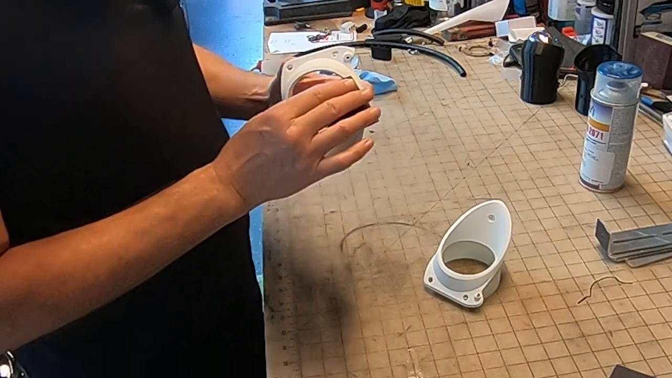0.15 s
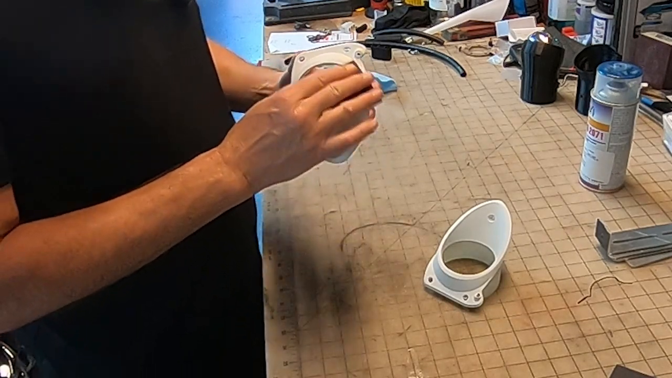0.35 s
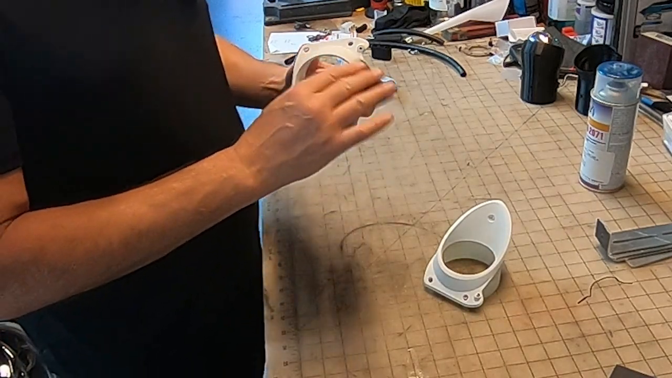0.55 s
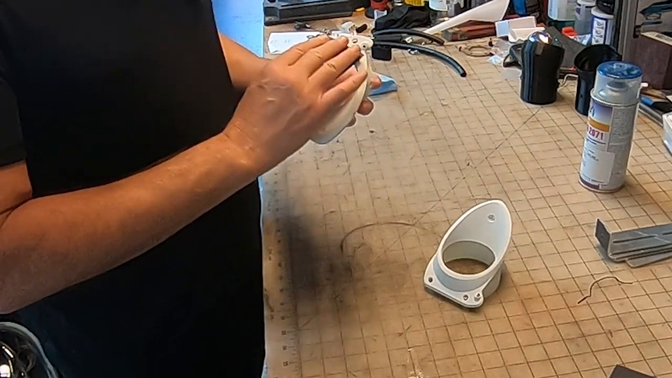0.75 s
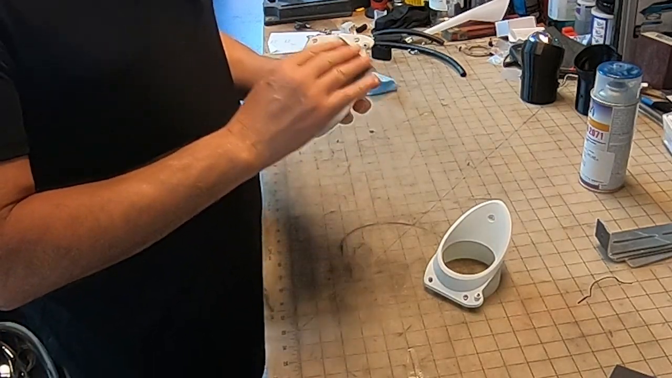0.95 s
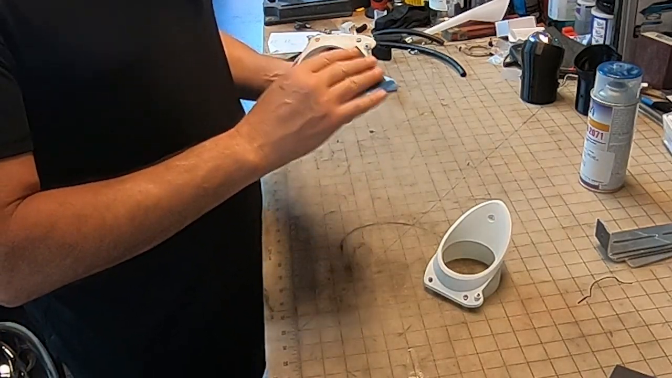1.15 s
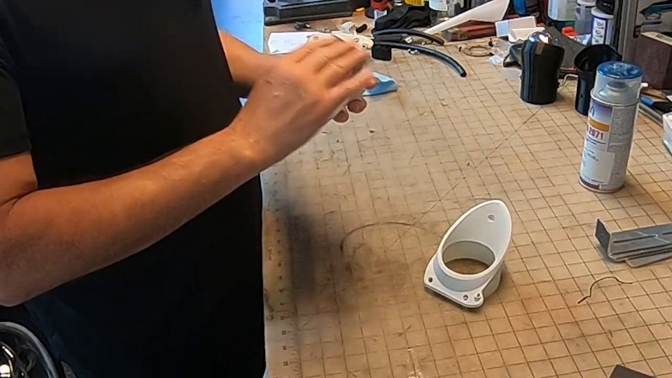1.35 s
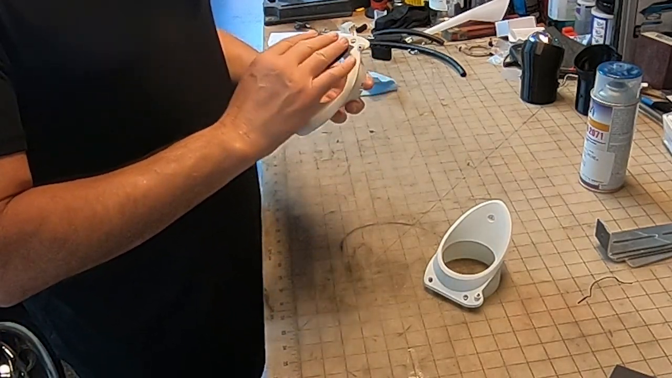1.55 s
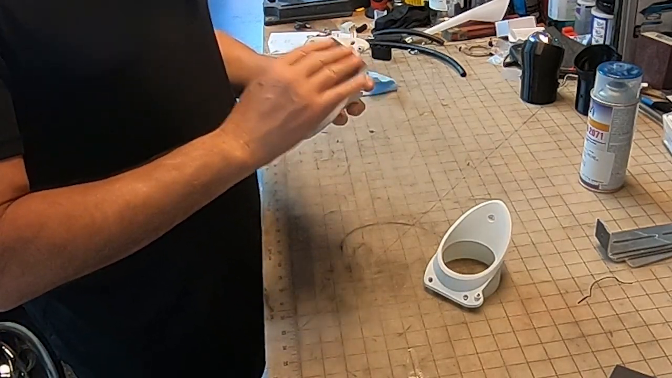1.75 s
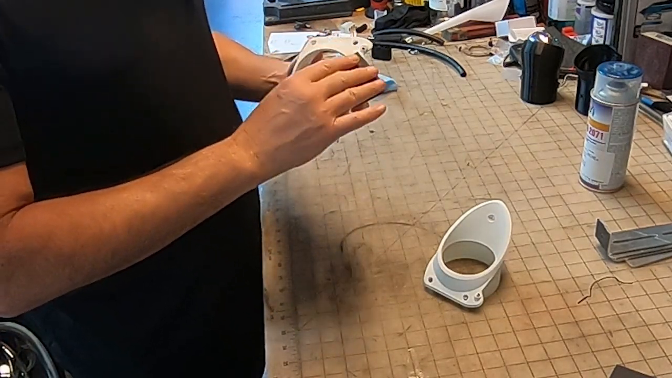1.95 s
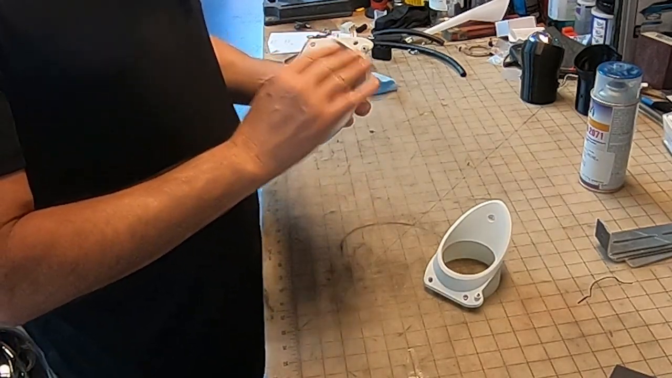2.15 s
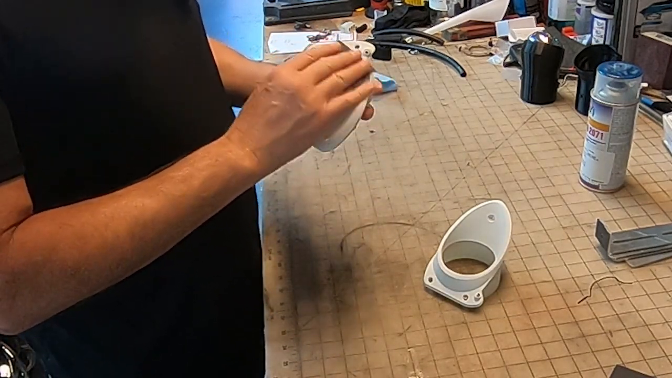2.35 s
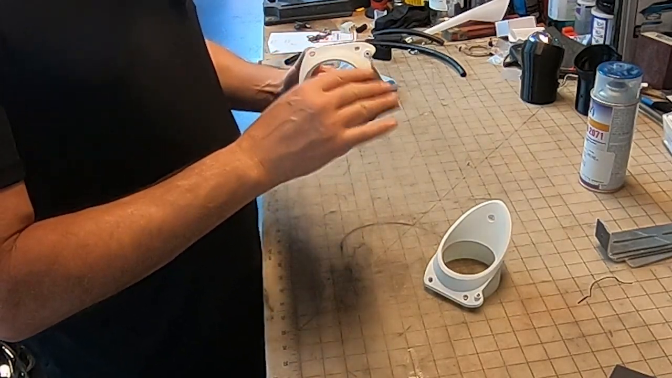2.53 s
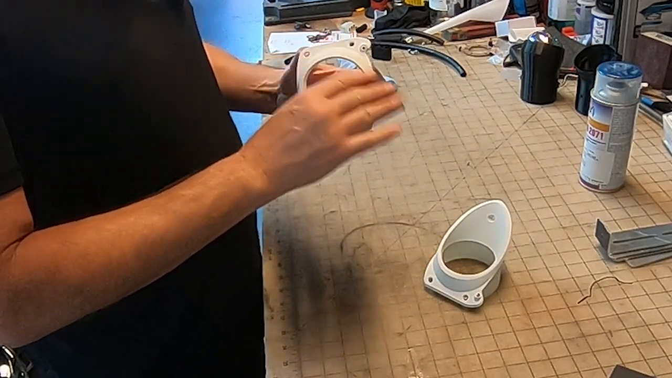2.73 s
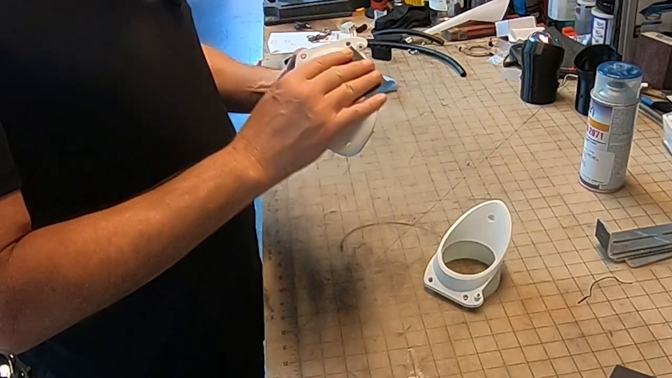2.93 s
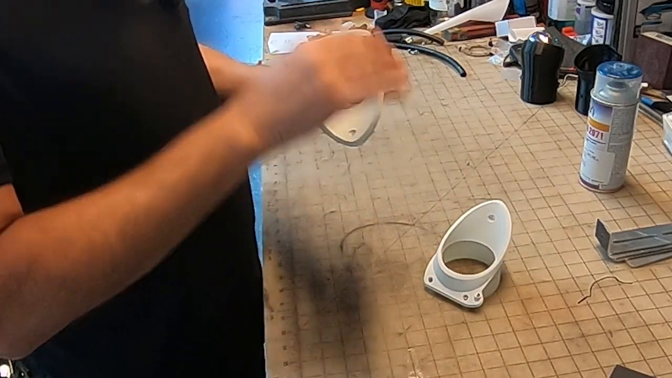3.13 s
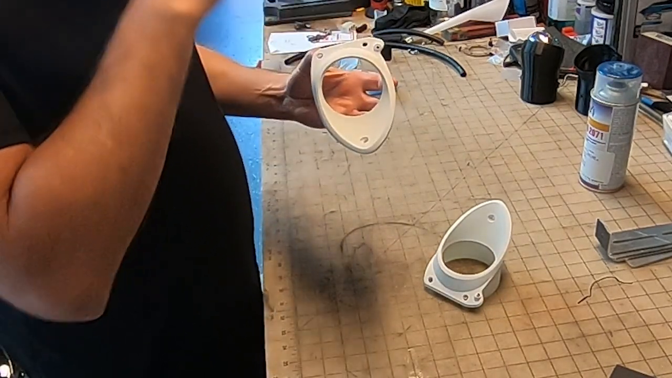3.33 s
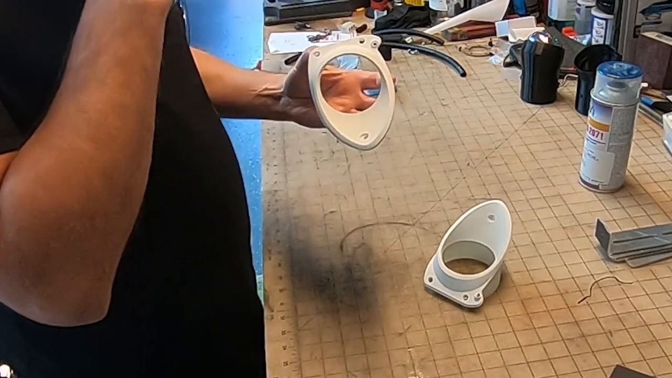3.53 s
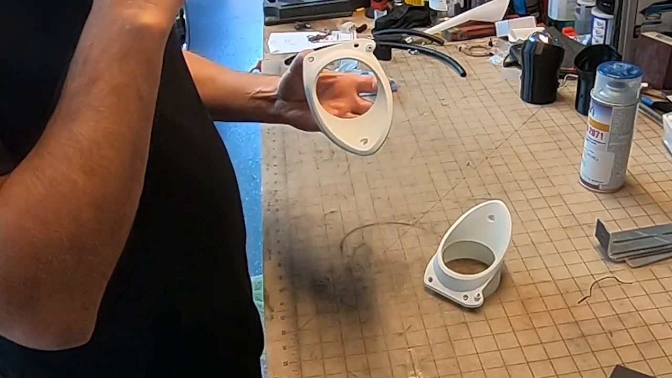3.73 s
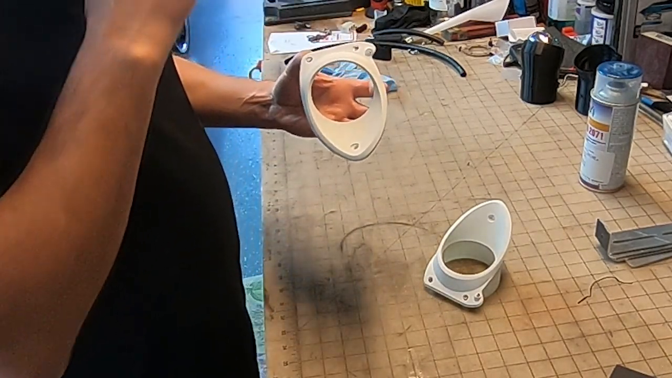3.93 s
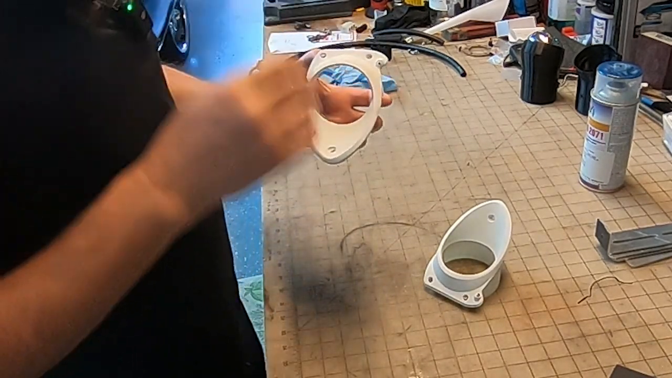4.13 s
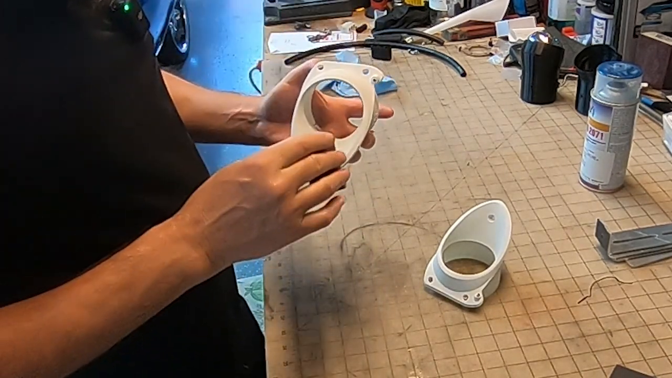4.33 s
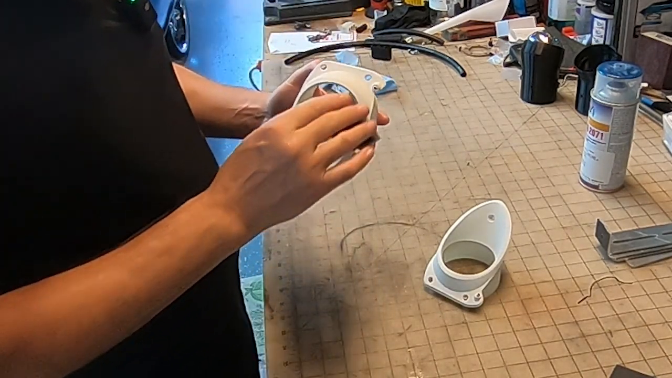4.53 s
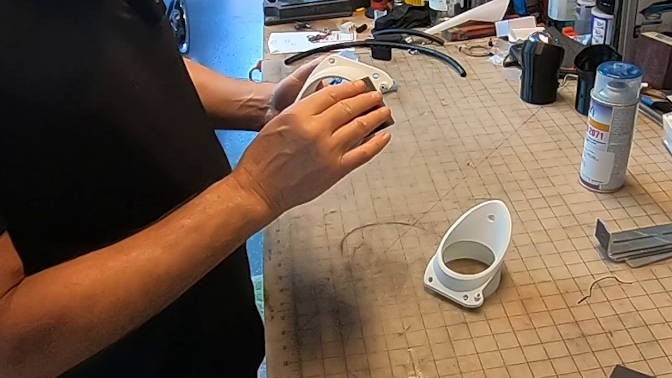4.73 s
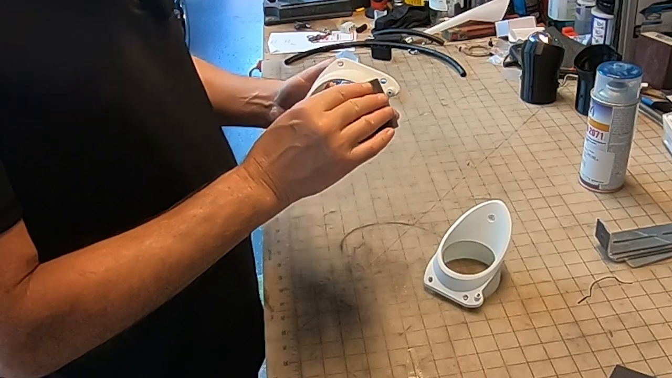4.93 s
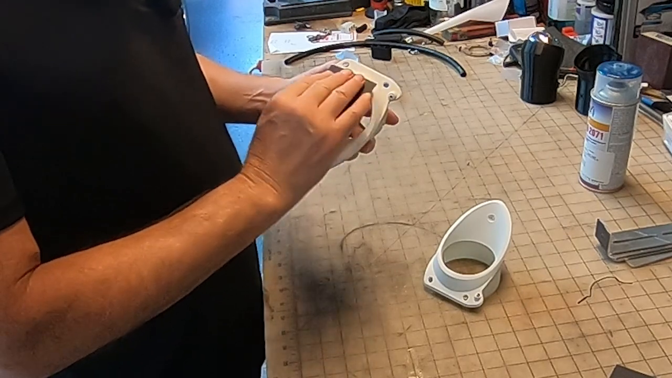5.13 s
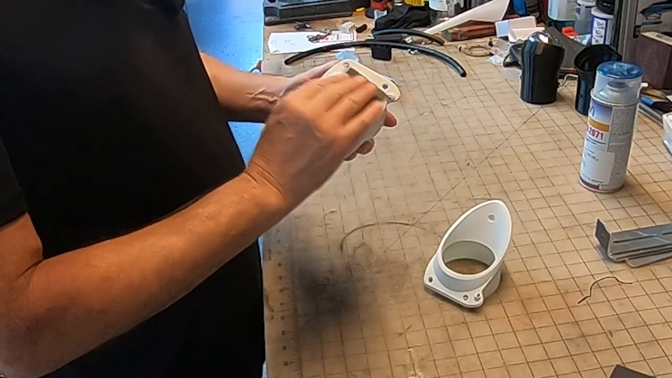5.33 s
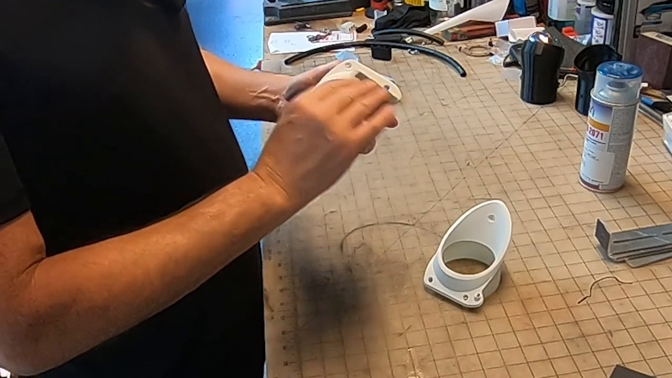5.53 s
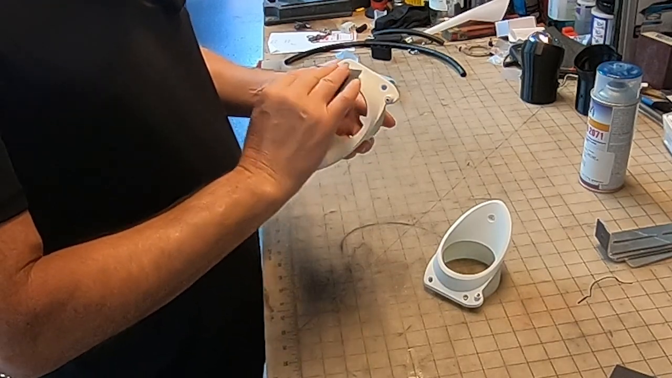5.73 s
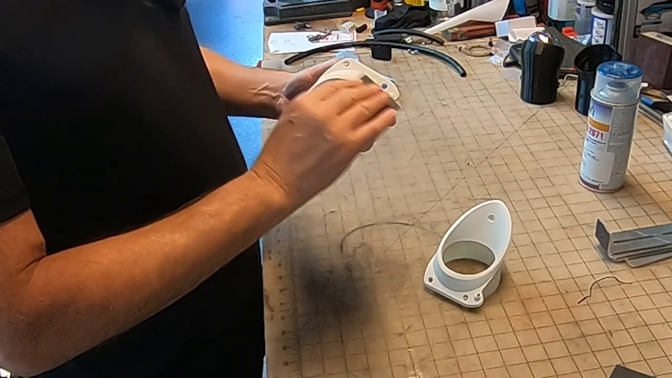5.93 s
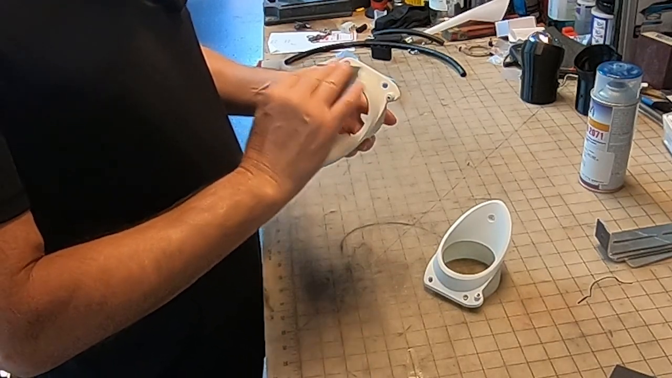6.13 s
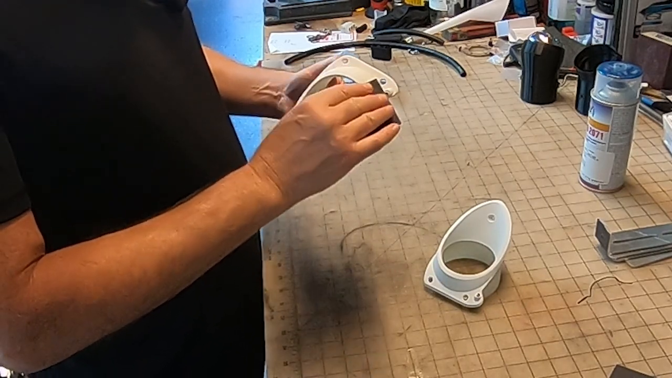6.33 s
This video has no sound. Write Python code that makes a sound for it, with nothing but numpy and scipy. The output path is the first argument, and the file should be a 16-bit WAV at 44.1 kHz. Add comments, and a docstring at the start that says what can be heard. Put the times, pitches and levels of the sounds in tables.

```python
"""Sanding a small plastic ring by hand

Two bouts of quick back-and-forth strokes: random grains of grit make the paper hiss and the plastic ring.
Now and then the paper bites on an edge, in bursts of denser grit with a rasp. Bursts of noise make knocks
and snaps. Around the pause the arm lifts, cloth rustles (shaped noise) and fingers rub (sparse grains).
A quiet workshop hums behind, made of sine tones and steady noise. Both channels are the same."""
import sys
import numpy as np
from scipy import signal
from scipy.fft import rfft, irfft, next_fast_len
from scipy.io import wavfile

SR = 44100
rng = np.random.default_rng(int(sys.argv[2]) if len(sys.argv) > 2 else 0)


def transcribe(u):
    """Save the signal u as a 16-bit wav file named by the first command-line argument.

    u: samples, shape (n,) or (channels, n), limited to [-1, 1]; the rate is SR.
    q: integer samples, one column per channel.
    """
    v = np.clip(np.atleast_2d(u).T, -1, 1)
    q = np.round(v * 32767).astype(np.int16)
    wavfile.write(sys.argv[1], SR, q)


N = 285768  # length in samples
TIME = np.arange(N) / SR  # seconds

# Sanding strokes, push and pull in turn.
# Each row: start in seconds, middle level in dB, rise of pressure over the stroke in dB.
STROKES = [(0.234, -46.5, 11.5), (0.49, -49, -4), (0.608, -43.5, -9), (0.778, -45, -13),
           (0.891, -46.5, -5.5), (1.055, -47, -10.5), (1.164, -45, -8), (1.32, -46.5, -5),
           (1.44, -47.5, -9), (1.587, -48, 2), (1.712, -47.5, -15.5), (1.858, -48, -6.5),
           (1.982, -47.5, -14), (2.13, -49, -1), (2.268, -47, -12.5), (2.413, -49.5, 4.5),
           (2.551, -48, -8.5), (2.688, -47.5, 14), (2.821, -48.5, -7.5), (2.96, -57, -21),
           (4.939, -48, 11.5), (5.15, -49.5, -8), (5.294, -48, -4), (5.455, -47.5, -3), (5.594, -50, -7.5),
           (5.767, -49, -2.5), (5.918, -49.5, -7.5), (6.105, -51, -4.5), (6.327, -51.5, -11)]
# Tone of dry rubbing, also used for the snaps. Each row: frequency in Hz, level in dB.
RUB_COLOUR = [(600, -37), (1200, -8), (1800, -5), (2600, -5.5), (4000, -6.5), (5200, -8.5), (8500, -4),
              (11500, -4.5), (14500, -1), (15700, -4)]


def undb(db):
    """Turn decibels into a gain."""
    return 10 ** (np.asarray(db) / 20)


def unit(x):
    """Scale a sound to an average (rms) level of 1."""
    return x / np.sqrt(np.mean(x ** 2) + 1e-30)


def add(track, start, x):
    """Mix a sound into a track at a time in seconds."""
    i = max(int(start * SR), 0)
    track[i:i + len(x)] += x[:max(N - i, 0)]


def colour(x, points):
    """Shape the tone of a sound through (Hz, dB) points, then scale it to rms 1."""
    hz, db = np.transpose(points)
    size = next_fast_len(len(x))
    f = np.maximum(np.fft.rfftfreq(size, 1 / SR), 1)
    gain = undb(np.interp(np.log(f), np.log(hz), db))
    return unit(irfft(rfft(x, size) * gain, size)[:len(x)])


def resonate(x, modes):
    """Let a sound ring (Hz, width Hz, dB) modes, with alternating sign; rms 1."""
    total = 0
    for k, (hz, width, db) in enumerate(modes):
        ringing = signal.lfilter(*signal.iirpeak(hz, hz / width, SR), x)
        total = total + (-1) ** k * undb(db) * ringing
    return unit(total)


def detune(modes, spread, spread_db):
    """The fingers press a little differently each time, which shifts each mode in pitch and level."""
    chances = rng.standard_normal((len(modes), 2))
    return [(hz * (1 + spread * a), width, db + spread_db * b)
            for (hz, width, db), (a, b) in zip(modes, chances)]


def walk(size, rate):
    """Random wandering with a spread near 1, which takes a new direction rate times a second."""
    points = rng.standard_normal(size)
    return 1.2 * np.interp(np.arange(size) * rate / SR, np.arange(size), points)


def grit(size, rate, spread_db):
    """Scratches of single grains, about rate a second, some larger than the rest; rms 1."""
    hit = rng.random(size) < rate / SR
    strength = rng.uniform(-1, 1, size)
    extra_db = spread_db * np.minimum(rng.exponential(size=size), 3.5)
    return unit(hit * strength * undb(extra_db))


def burst(t60):
    """Noise that starts at once and dies away by 60 dB in t60 seconds."""
    t = np.arange(SR // 8) / SR
    return rng.standard_normal(len(t)) * np.exp(-np.log(1000) * t / t60)


def sweep(start, end, skew, grip, sticking=2.04):
    """Progress (-.5 to .5) and rubbing strength of one stroke: the hand is at rest at both ends."""
    u = np.linspace(0, 1, int((end - start) * SR))
    return u - .5, np.tanh(grip * np.abs(np.sin(np.pi * u ** skew)) ** sticking)


def stroke_spans():
    """Start and end of each stroke: it runs until the hand turns, stops or reaches its limit."""
    # When the hand stops at the end of each bout, in seconds.
    bout_ends_s = [3.134, 6.57]
    longest_s = .24  # the full reach of the wrist, without the overlap
    overlap_s = 0.0048  # the paper still slides as the hand turns
    starts = [row[0] for row in STROKES]
    spans = []
    for start in starts:
        limits = starts + bout_ends_s + [start + longest_s]
        spans.append((start, min(end for end in limits if end > start) + overlap_s))
    return spans


def workshop():
    """Steady air noise and the slightly wavering hum of a fan motor, one sine for each tone."""
    # Motor hum. Each row: frequency in Hz, middle level in dB rms.
    hum_tones = [(43, -86.5), (75, -93), (113, -84), (225, -86), (240, -84.5), (360, -90.5), (600, -88),
                 (721, -100)]
    # Tone of the air noise. Each row: frequency in Hz, level per Hz in dB.
    air_colour = [(15, -30), (25, 0.5), (42, 2), (156, -5), (234, -2.5), (307, -9), (485, -5), (540, -13.5),
                  (602, -5.5), (652, -11.5), (727, -5), (1000, -10), (2080, -13.5), (15700, -26)]
    air_db = -73.5
    hum = 0
    for hz, db in hum_tones:
        loudness = undb(db + 2.0 * walk(N, rate=4))
        phase_drift = .5 * walk(N, rate=5)  # radians
        hum = hum + loudness * np.sin(2 * np.pi * hz * TIME + phase_drift)
    air = undb(air_db) * colour(rng.standard_normal(N), air_colour)
    return np.sqrt(2) * hum + air  # the root of 2 turns sine peaks into rms levels


def room(x, t60=0.3, tail_db=-11.5, bench_s=.0021, bench_db=-13):
    """The bench top reflects almost at once; the cluttered room adds a short tail of fading noise."""
    t = np.arange(SR // 2) / SR
    tail = rng.standard_normal(len(t)) * np.exp(-np.log(1000) * t / t60) * (t > .004)
    tail = colour(tail, [(200, 4.0), (2000, -1.0), (6000, 1), (15000, 0.5)])
    response = undb(tail_db) * tail / np.sqrt(len(t))
    response[0] += 1  # the direct sound
    response[int(bench_s * SR)] += undb(bench_db)
    return signal.fftconvolve(x, response)[:N]


def flutter(pitch):
    """Low flapping of loose cloth, as shaped noise; larger folds sound lower."""
    # Tone of the flapping at pitch 1. Each row: frequency in Hz, level in dB.
    flap_colour = [(70, -31), (130, -5), (190, 3.5), (260, 0), (340, -11), (700, -27)]
    return colour(rng.standard_normal(N), [(hz * pitch, db) for hz, db in flap_colour])


def cloth(flutter_db=-1, swish_db=-2, folds_db=2.0):
    """The shirt flutters and swishes softly during the strokes, and swells with each larger arm move."""
    # Arm moves that stir the shirt. Each row: peak time in seconds, rise in seconds, fall in seconds,
    # flutter in dB, flutter pitch as a ratio, swish in dB (both before the overall gains flutter_db, swish_db).
    arm_moves = [(0.05, .2, 0.4, -74, 1.08, -73), (2.6, .25, 0.27, -70.5, 1.06, -81),
                 (3.1, 0.13, .1, -60.5, 1.01, -79), (3.4, 0.091, 0.044, -72, 0.93, -75.5),
                 (4.32, 0.27, .05, -70.5, 0.75, -78), (4.75, .12, 0.2, -71.5, 1.43, -70),
                 (6.32, 0.03, 0.038, -89, 1, -67)]
    # Tone of brushing cloth. Each row: frequency in Hz, level in dB.
    swish_colour = [(200, -15), (350, -1), (650, -0.5), (1100, -6.5), (2500, -17.5), (8000, -39)]
    working = sum((TIME >= start) & (TIME < end) for start, end in stroke_spans()) > 0
    # soft cloth sound while the arm works, also before the overall gains
    low = working * undb(-84) * flutter(0.93)
    brushing = working * undb(-78)
    for s, rise_s, fall_s, low_db, pitch, mid_db in arm_moves:
        distance = np.maximum((s - TIME) / rise_s, (TIME - s) / fall_s)
        speed = 1 / np.cosh(np.minimum(distance, 20))
        low = low + undb(low_db) * speed * flutter(pitch)
        brushing = np.hypot(brushing, undb(mid_db) * speed)
    swish = brushing * colour(grit(N, rate=4000, spread_db=1.5), swish_colour)
    folds = undb(folds_db * walk(N, rate=70))
    return (undb(flutter_db) * low + undb(swish_db) * swish) * folds


def light_touch(size, spectrum, hollow_db):
    """Sparse grains with the hollow note of the folded sheet."""
    grains = colour(grit(size, rate=7000, spread_db=2.0), spectrum)
    hollow = resonate(rng.standard_normal(size), [(1714, 120, 0)])
    return unit(grains + undb(hollow_db) * hollow)


def handling():
    """The paper settles on the part, and the fingers rub it: sparse grains that swell and fade."""
    # Paper shifting lightly before each bout. Each row: start in seconds, end in seconds, level in dB.
    settlings = [(0.029, 0.067, -67.5), (4.554, 4.75, -71), (4.68, 4.84, -59.5), (4.799, 4.966, -64.5)]
    # Tone of that shifting. Each row: frequency in Hz, level in dB.
    settling_colour = [(290, -37), (500, -6.5), (890, 0), (1070, -2), (1540, 4.5), (3080, -1.5), (3500, 0),
                       (4350, -6), (5020, -4.5), (5640, -3), (15700, -7)]
    # Light dry finger rubs. Each row: start in seconds, end in seconds, level in dB,
    # hollow note in dB against the grains, change of treble in dB.
    rubs = [(0, 0.237, -73.5, 10, -4), (3.195, 3.213, -65.5, -17, -11), (3.547, 3.686, -66, -5, 8.5),
            (3.706, 3.828, -64, -9.5, 5), (3.851, 3.998, -60.5, -4.5, 4), (4.072, 4.127, -67.5, -19, -5),
            (4.227, 4.277, -70, -12, -14), (6.286, 6.365, -62.5, -5, -7)]
    out = np.zeros(N)
    for start, end, db in settlings:
        along, strength = sweep(start, end, skew=0.67, grip=3.2)
        add(out, start, undb(db) * strength * light_touch(len(along), settling_colour, hollow_db=-20.5))
    for start, end, db, hollow_db, bright_db in rubs:
        along, strength = sweep(start, end, skew=1.05, grip=1.75)
        rub = light_touch(len(along), RUB_COLOUR, hollow_db)
        rub = colour(rub, [(7000, 0), (12000, bright_db)])
        add(out, start, undb(db) * strength * rub)
    return out


def taps():
    """Dull knocks of the hand and bright snaps of the stiff paper, some ringing the part: noise bursts."""
    # Soft knocks. Each row: time in seconds, peak in dB, centre in Hz, 60 dB decay of the burst in seconds.
    knocks = [(3.08, -42.5, 400, 0.022), (3.0875, -51, 600, 0.022), (4.334, -56.5, 171, 0.042),
              (4.4482, -54.5, 620, 0.022)]
    # Paper snaps. Each row: time in seconds, peak in dB, 60 dB decay of the burst in seconds,
    # ringing in dB against the crack.
    snaps = [(0.798, -36.5, 0.035, 12), (2.4286, -43, .04, 12), (3.4675, -46.5, 0.049, 5),
             (3.499, -57, .02, 4), (3.6295, -47, .003, -17), (3.672, -48, 0.0041, -21),
             (3.874, -44, .005, -20), (3.918, -47, .005, -17), (3.959, -50, .003, 0),
             (4.852, -46, 0.016, -22), (6.204, -58, .03, -3), (6.3242, -41.5, 0.022, 0.5)]
    # What a snap rings in the part and the sheet. Each row: centre in Hz, width in Hz, level in dB.
    snap_modes = [(1640, 150, 6), (4080, 230, 1), (8000, 400, -10), (15300, 600, -1.5)]
    out = np.zeros(N)
    soften = signal.butter(2, 1400, fs=SR, output="sos")  # Hz; flesh gives little treble
    for s, db, hz, t60 in knocks:
        knock = resonate(burst(t60), [(hz, 1.3 * hz, 0)])
        knock = resonate(knock, [(hz, 1.6 * hz, 0)])
        knock = signal.sosfilt(soften, knock)
        add(out, s, undb(db) * knock / np.abs(knock).max())
    for s, db, t60, ring_db in snaps:
        crack = burst(t60)
        bright = colour(colour(crack, RUB_COLOUR), [(5000, 0), (12000, 3)])
        snap = bright + undb(ring_db) * resonate(crack, snap_modes)
        add(out, s, undb(db) * snap / np.abs(snap).max())
    return out


def paper(scratches, start, bright_db=0, resonance_db=-8, ripple_db=2.0):
    """Scratches leave the sheet as hiss, coloured anew by each position of the cupped hand."""
    # Hiss in the first and the second grip. Each row: frequency in Hz, level per Hz in dB.
    hiss_first = [(1650, -36), (2800, -38), (2900, -6.5), (3630, -8), (4130, -6), (5130, -1.5),
                  (5720, -2.5), (6280, -1.5), (6950, -4.5), (8940, -0.5), (12300, -3.5), (15000, -1),
                  (15700, -5.5)]
    hiss_second = [(1650, -32), (2750, -5.5), (3150, -4), (3600, -9), (4200, -5.5), (5000, 2.5),
                   (5600, -5.5), (6300, 1.5), (8800, -1.5), (9800, -4.5), (11200, -1.5), (13300, -4),
                   (15100, 3), (15700, -2.5)]
    # Paper resonances under the fingers in each grip. Each row: centre in Hz, width in Hz, level in dB.
    modes_first = [(4994, 230, 1.5), (5280, 210, -3), (6180, 230, -2), (7830, 260, -1), (9100, 150, -16)]
    modes_second = [(3550, 170, -5), (5050, 200, -1), (6200, 300, -1.5), (7770, 220, -2), (8880, 130, 0)]
    regrip_s = 4  # the second grip is used from here on
    hiss, modes = (hiss_first, modes_first) if start < regrip_s else (hiss_second, modes_second)
    coarse = grit(len(scratches), rate=11000, spread_db=0.0)
    ringing = resonate(coarse, detune(modes, spread=0.012, spread_db=2.5))
    sheet = colour(scratches, hiss) + undb(resonance_db) * ringing
    # reflections between palm and part ripple the spectrum
    hz = np.linspace(3000, 16000, 40)
    treble_db = np.interp(hz, (6000, 11000), (0, bright_db))
    ripple = ripple_db * rng.standard_normal(len(hz))
    return colour(sheet, np.transpose([hz, treble_db + ripple]))


def plastic(scratches):
    """Scratches ring the hand-held part, whose modes shift with the squeeze of the fingers."""
    # Modes of the plastic ring, damped by the hand. Each row: middle pitch in Hz, width in Hz, level in dB.
    ring_modes = [(854, 86, -10.5), (1192, 147, -7), (1516, 140, -2.5), (1692, 93, 2.5), (1904, 136, -3),
                  (2088, 160, -1), (2398, 67, -1), (2557, 126, -3.5), (3605, 310, 8)]
    # How well so small a part gives off sound. Each row: frequency in Hz, level in dB.
    radiation = [(100, -12), (400, 0), (800, 0), (1400, -0.5), (2650, 3), (3000, -15), (4000, -12.5),
                 (6000, -19), (12000, -36)]
    return colour(resonate(scratches, detune(ring_modes, spread=0.016, spread_db=1.5)), radiation)


def bites(attack_s=.003, release_s=0.015, ring_db=-16, rasp_db=-8):
    """On an edge the pressure jumps and the sheet rasps in one broad resonance."""
    # Bites of the paper. Each row: start in seconds, end in seconds, level in dB.
    bite_rows = [(0.514, 0.54, -53.5), (0.583, 0.596, -44), (0.867, 0.879, -41), (0.917, 0.961, -43),
                 (1.13, 1.15, -52), (1.678, 1.699, -51), (1.946, 1.968, -41), (2.205, 2.235, -40.5),
                 (2.471, 2.516, -42.5), (2.734, 2.774, -41.5), (3.005, 3.065, -44)]
    out = np.zeros(N)
    for start, end, db in bite_rows:
        t = np.arange(int((end - start + (attack_s + release_s) / 2) * SR)) / SR
        contact = np.minimum(np.minimum(t / attack_s, t[::-1] / release_s), 1)
        fine = grit(len(t), rate=36000, spread_db=1.1)
        coarse = grit(len(t), rate=11000, spread_db=1.5)
        rasp = resonate(coarse, detune([(5240, 590, 0)], spread=0.057, spread_db=0))
        rasping_paper = unit(paper(fine, start) + undb(rasp_db) * rasp)
        sound = rasping_paper + undb(ring_db) * plastic(coarse)
        add(out, start - attack_s / 2, undb(db) * contact * sound)
    return out


def dull_when_slow(x, speed, corner_hz=7500, power=1.0):
    """Slow grains make less treble, so the part above the corner follows the speed."""
    low = signal.sosfiltfilt(signal.butter(2, corner_hz, fs=SR, output="sos"), x)
    return low + (x - low) * speed ** power


def sanding(hiss_chatter_db=0.64, ring_chatter_db=1.1, swell_db=1, bumps_db=1.25, ring_bumps_db=1.5):
    """Each stroke drags fine and coarse grit over the rough surface, whose ridges make friction chatter."""
    # Ringing of the part against the hiss, as the paper works round the rim.
    # Each row: time in seconds, level in dB.
    plastic_db = [(0.3, -6), (0.8, -8.5), (1.5, -5), (2.7, -7.5), (5.0, -4.5), (5.5, -8), (6.4, -7.5)]
    # the part rings more at the far end of the travel: change over a stroke in dB
    push_ring_db, pull_ring_db = 8, -3.5
    ring_lead_s = .003  # the part rings as soon as the grit grips, before the hiss builds
    out = np.zeros(N)
    for k, ((start, end), (_, db, rise_db)) in enumerate(zip(stroke_spans(), STROKES)):
        along, strength = sweep(start, end, skew=0.84, grip=3.96)
        size = len(along)
        chatter = walk(size, rate=164)
        bumps = walk(size, rate=39)
        effort_db = db + rise_db * along
        pressure_db = swell_db * np.cos(2 * np.pi * along) + bumps_db * bumps

        # the hand rolls round the rim, so one colour of hiss gives way to another
        early, late = (paper(grit(size, rate=30000, spread_db=2.5), start, bright_db=.5) for _ in range(2))
        roll = np.pi / 4 * (1 + np.sin(np.pi * along))
        hiss = dull_when_slow(np.cos(roll) * early + np.sin(roll) * late, strength)
        hiss_db = effort_db + pressure_db + hiss_chatter_db * chatter
        add(out, start, strength * hiss * undb(hiss_db))

        _, drag = sweep(start, end, skew=0.88, grip=6.5, sticking=2.5)
        travel_db = (pull_ring_db if k % 2 else push_ring_db) * along
        ring_db = effort_db + np.interp(start, *np.transpose(plastic_db)) + travel_db
        ring_db = ring_db + ring_chatter_db * chatter + ring_bumps_db * bumps
        ring = plastic(grit(size, rate=10000, spread_db=2.0))
        add(out, start - ring_lead_s, drag * undb(ring_db) * ring)
    return out


def scene():
    """All the handwork in the room, over the workshop, the same in both channels."""
    handwork = cloth() + handling() + taps() + bites() + sanding()
    mono = room(handwork) + workshop()
    return np.array([mono, mono])


def record(dry):
    """The recorder cuts the top steeply, above 15750 Hz."""
    return signal.sosfiltfilt(signal.ellip(10, .1, 60, 15750, fs=SR, output="sos"), dry)


dry = scene()
out = record(dry)
transcribe(out)
```